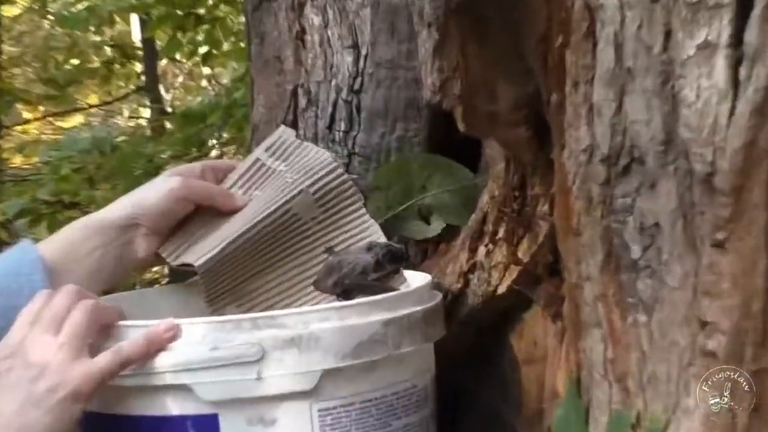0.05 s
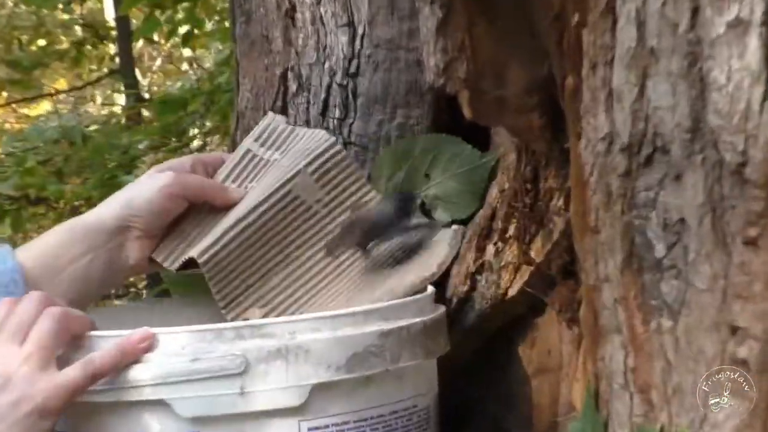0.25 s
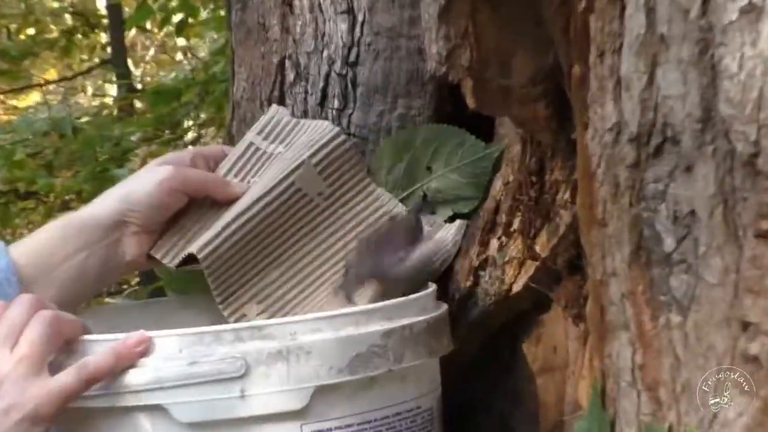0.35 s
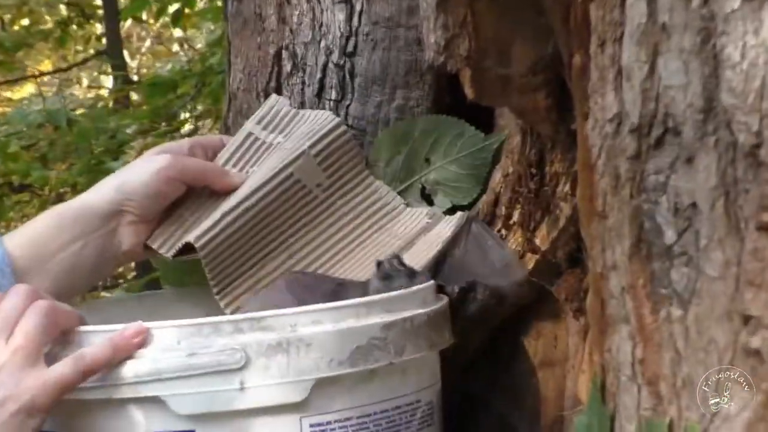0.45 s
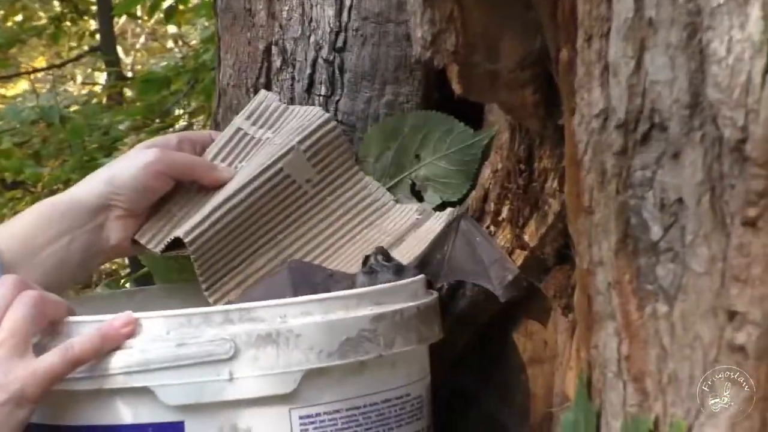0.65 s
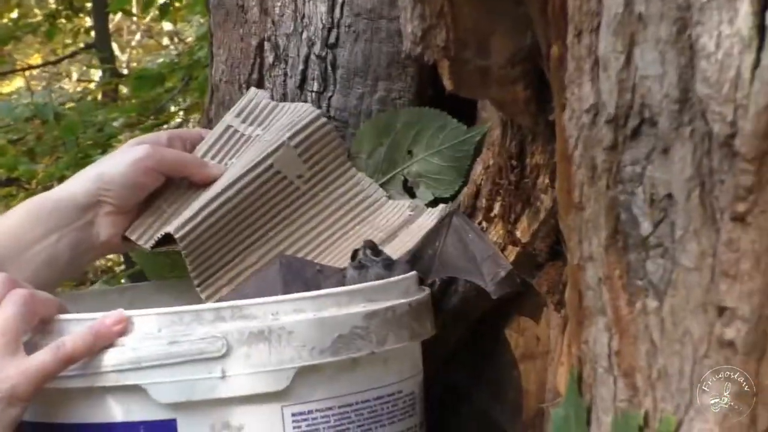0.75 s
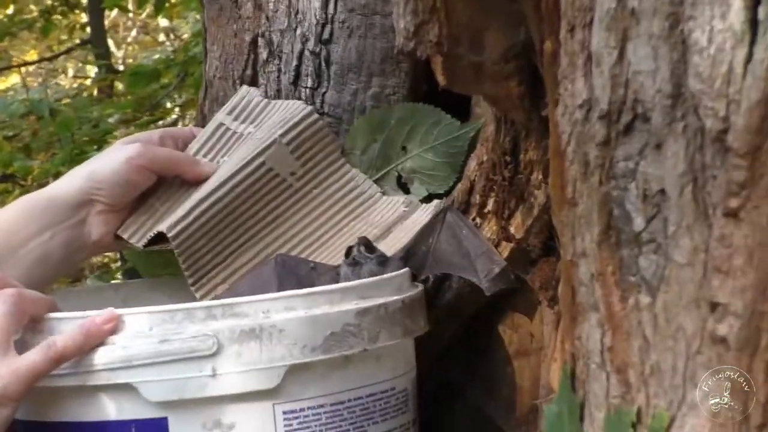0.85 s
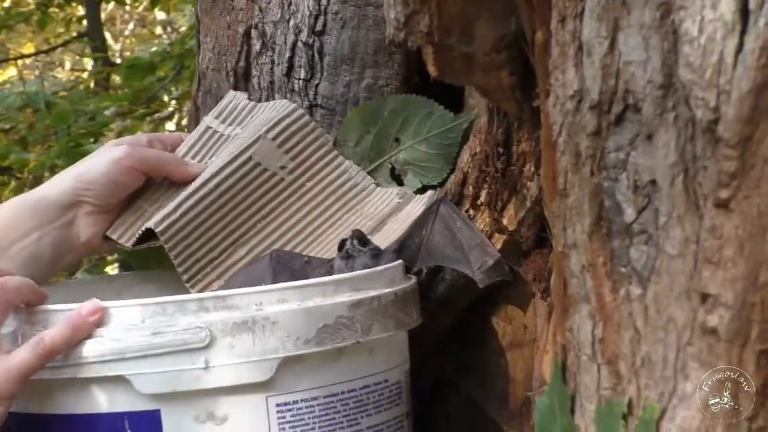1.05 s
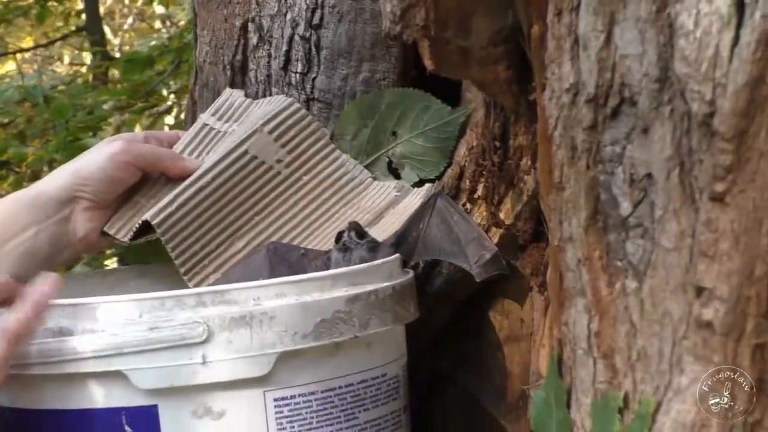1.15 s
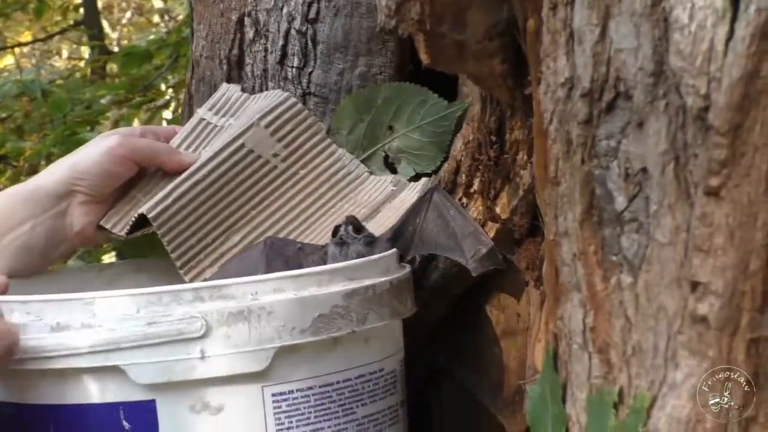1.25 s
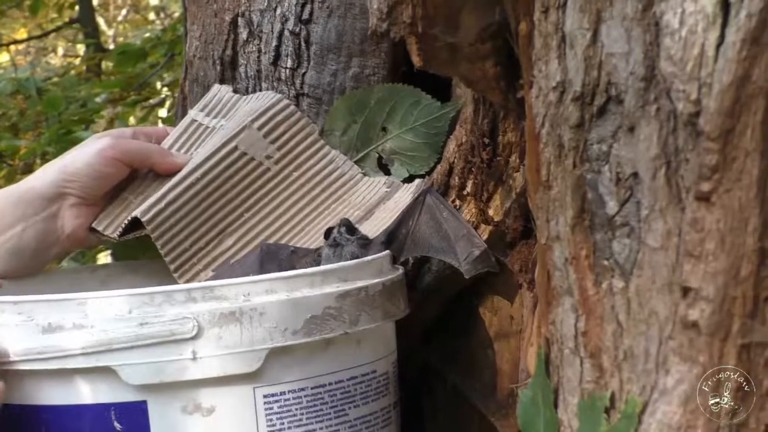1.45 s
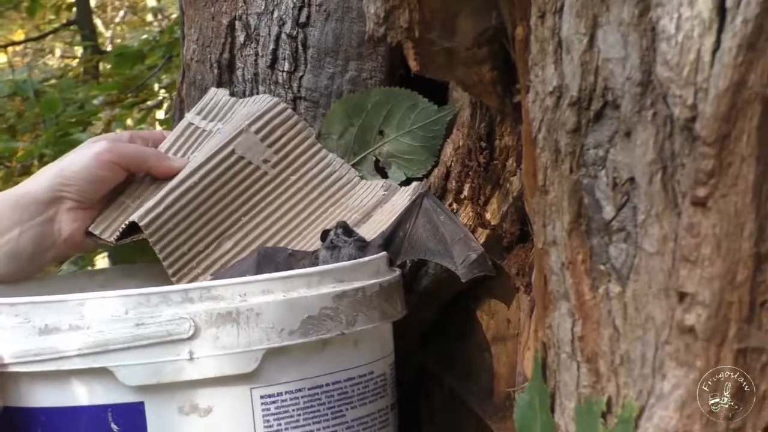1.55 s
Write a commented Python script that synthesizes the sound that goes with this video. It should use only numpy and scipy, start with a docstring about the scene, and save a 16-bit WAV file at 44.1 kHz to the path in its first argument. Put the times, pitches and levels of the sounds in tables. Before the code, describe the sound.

Close by in quiet woods, a bat gives a gritty, clicking hiss right after a brief slide over corrugated cardboard and a thump on a plastic bucket. The hiss stops with a thin squeak, then fingers softly rub the rim.

```python
"""Beside a tree in a murmuring wood, a bat slides off corrugated cardboard and thumps a plastic bucket.
Its claws catch on the card's ridges, then tap the rim and set it ringing. It hisses for one second:
a rasping jet of air through the mouth, broken by sharp clicks that crowd together into a last squeak.
A hand shifts on the rim, and bucket and trunk throw back close echoes."""
import sys
import numpy as np
from scipy import signal
from scipy.fft import rfft, irfft
from scipy.io import wavfile

SR = 44100
rng = np.random.default_rng(int(sys.argv[2]) if len(sys.argv) > 2 else 0)


def waveform_to_disk(signal):
    """Save audio, clipped to [-1, 1], as 16-bit WAV at the path in sys.argv[1]."""
    frames = np.transpose(np.atleast_2d(signal))
    scaled = np.clip(frames, -1, 1) * 32767
    samples = np.round(scaled).astype(np.int16)
    wavfile.write(sys.argv[1], SR, samples)


N = 70560
TIME = np.arange(N) / SR


def from_db(db):
    """Decibels to gain."""
    return 10 ** (np.asarray(db) / 20)


def rms_one(x):
    """Scale to unit power."""
    return x / np.sqrt(np.mean(x ** 2) + 1e-20)


def curve(rows):
    """Join (t/s, value) rows by straight lines."""
    return np.interp(TIME, *np.transpose(rows))


def gesture(rows):
    """A fader move through (t/s, level/dB) rows, silent outside them."""
    return from_db(np.interp(TIME, *np.transpose(rows), left=-200, right=-200))


def noise():
    """White noise."""
    return rng.standard_normal(N)


def coloured(x, spectrum):
    """EQ x through (f/Hz, level/dB) points, then scale to unit power."""
    hz, db = np.transpose(spectrum)
    bins = np.maximum(np.fft.rfftfreq(N, 1 / SR), 1)
    eq = from_db(np.interp(np.log(bins), np.log(hz), db))
    return rms_one(irfft(rfft(x) * eq, N))


def cut(x, hz, kind, order=2):
    """Butterworth low- or high-pass."""
    return signal.sosfilt(signal.butter(order, hz, kind, fs=SR, output="sos"), x)


def bell(at_s, half_s):
    """A smooth pulse of height 1."""
    return np.exp(-.5 * ((TIME - at_s) / half_s) ** 2)


def strikes(rows):
    """One impulse for each (t/s, level/dB) row."""
    times, db = np.transpose(rows)
    samples = np.clip(times * SR, 0, N).astype(int)
    return np.bincount(samples, from_db(db), N + 1)[:N]


def resonance(x, hz, width_hz, block=256):
    """A sweepable band-pass with gain 1 at its peak."""
    r, hz = np.exp(-np.pi * width_hz / SR), np.broadcast_to(hz, N)
    zeros = np.array([1, 0, -1]) * (1 - r * r) / 2
    out, state = np.zeros(N), np.zeros(2)
    for i in range(0, N, block):
        poles = [1, -2 * r * np.cos(2 * np.pi * hz[i] / SR), r * r]
        out[i:i + block], state = signal.lfilter(zeros, poles, x[i:i + block], zi=state)
    return out


def ring(clicks, modes):
    """Clicks set decaying sines going, one for each (f/Hz, level/dB, t60/s) row."""
    out = np.zeros(N)
    for hz, db, t60 in modes:
        r, w = np.exp(-np.log(1000) / (t60 * SR)), 2 * np.pi * hz / SR
        out += from_db(db) * signal.lfilter([1, -1], [1, -2 * r * np.cos(w), r * r], clicks + 1e-18)
    return out


def tail(t60):
    """A reverb tail of decaying noise; energy 1."""
    return rms_one(noise() * np.exp(-np.log(1000) * TIME / t60)) / np.sqrt(N)


# tone of the woodland bed: f/Hz, level/dB
WOOD_EQ = [(15, -54), (25, -31), (97, -9), (195, -8), (249, -1.5), (344, -3), (560, -9.5), (624, -14),
           (796, -11), (936, -10.5), (1130, -7.5), (2280, -16.5), (2550, -15.5), (5140, -29.5),
           (6380, -28.5), (7310, -33), (9840, -32), (13600, -34), (16000, -42)]
def wood(level_db=-46, drift_db_per_s=-.5):
    """The wood murmurs: a dark bed of noise, easing off slightly."""
    return from_db(level_db + drift_db_per_s * (TIME - TIME.mean())) * coloured(noise(), WOOD_EQ)


# pressure of the slide over the card: t/s, level/dB
SLIDE_PRESSURE = [(.212, -60), (.222, -39), (.2255, -27.5), (.232, -25.5), (.248, -23), (.256, -33.5),
                  (.262, -31), (.268, -28.5), (.283, -45), (.295, -52)]
# the wing brushes the card as it spreads: t/s, level/dB
WING_BRUSH = [(.29, -53), (.33, -73), (.39, -40.5), (.42, -54), (.48, -40.5), (.53, -66), (.6, -75)]
# tone of the card: f/Hz, level/dB
CARD_EQ = [(60, -43), (250, -18), (500, -4.5), (900, -9.5), (1240, -0.5), (2090, -6.5), (2550, 1.5),
           (2850, -4.5), (3800, -2), (7970, -14.5), (10300, -11), (15000, -17.5)]
def cardboard(slips_per_s=3500, spread_db=3):
    """Claws and wing catch on the ridges in a dense run of tiny slips."""
    catches = rng.random(N) < slips_per_s / SR
    slips = catches * from_db(spread_db * noise()) * rng.choice([-1, 1], N)
    return coloured(slips, CARD_EQ) * (gesture(SLIDE_PRESSURE) + gesture(WING_BRUSH))


# claw hits: t/s, level/dB
CLAW_TAPS = [(0.247, -22), (0.277, -32), (0.297, -28.5), (0.3883, -23), (0.396, -40), (0.9964, -33),
             (1.4823, -45), (1.497, -34)]
# what a claw sets ringing in the rim: f/Hz, level/dB, t60/s
RIM_MODES = [(1150, -17, 0.022), (1260, -3, 0.023), (1580, -5.5, 0.018), (2100, -13, 0.0083),
             (2874, -5.5, 0.017), (3630, -11, 0.0057), (4400, -30, 0.0053), (7100, -11, .002)]
def claws(scratch_hz=2700, waver_hz=170):
    """Claws tap dryly on the rim and slip once with a short squeak."""
    taps = ring(cut(strikes(CLAW_TAPS), hz=5900, kind="low"), RIM_MODES)
    slip_hz = scratch_hz + waver_hz * rms_one(cut(noise(), hz=603, kind="low"))
    slip_tone = np.sin(2 * np.pi * np.cumsum(slip_hz) / SR)
    return taps + from_db(-26.5) * bell(at_s=.4595, half_s=.0024) * slip_tone


# body hits on the bucket: t/s, level/dB
BODY_THUMPS = [(.2495, -13.5), (.2965, -29.5), (.302, -33.5)]
# modes of the bucket: f/Hz, level/dB, t60/s
BUCKET_MODES = [(248, -20, 0.13), (380, -9.5, 0.031), (434, -3, 0.023), (510, -10.5, 0.026),
                (1193, -2, 0.04), (1290, -17, 0.12), (2138, -19, 0.19), (2600, -14, .1)]
def bucket(soft_hz=890, low_cut_hz=248, hum_at_s=.299, hum_hz=257, hum_t60_s=.14):
    """The soft body bumps the plastic wall, which radiates little bass and hums on briefly."""
    push = cut(strikes(BODY_THUMPS), soft_hz, "low")
    thump = ring(cut(push, low_cut_hz, "high"), BUCKET_MODES)
    age = np.maximum(TIME - hum_at_s, 0)
    hum = from_db(-30) * np.exp(-np.log(1000) * age / hum_t60_s) * np.sin(2 * np.pi * hum_hz * age)
    return thump + cut(hum, low_cut_hz / 2, "high")


def rasp(puffs_per_s=270, jitter=.3, decay_s=.00059, spread_db=3, depth=.8, count=800):
    """The airflow flutters in quick uneven puffs, giving the hiss its grit."""
    times = np.cumsum(np.exp(jitter * rng.standard_normal(count))) / puffs_per_s
    db = spread_db * np.clip(rng.standard_normal(count), -2, 2)
    onsets = strikes(np.column_stack([times, db]))
    puffs = signal.lfilter([1], [1, -np.exp(-1 / (decay_s * SR))], onsets)
    return rms_one(1 + depth * puffs)


# mouth resonances: f/Hz, share of the jaw shift, relaxed level/dB, strained level/dB
MOUTH_FORMANTS = [(3810, 0.67, -15.5, -8.5), (4773, 0.9, -8.5, -5.5), (5520, .2, -9.5, -8.5),
                  (6775, 0.099, -7.5, -2), (8590, 0.32, -3.5, -0.5), (9810, 0.52, 1, -8.5),
                  (11530, 0.91, 4, -5), (13280, 0.83, 5, 2.5), (14720, 0.19, -2, 7), (16400, 0.17, -4, 3.5)]
# head and jaw move and bend the resonances together: t/s, shift/%
JAW_SHIFT = [(.30, 3), (.335, 0), (.37, -6.5), (.405, 3), (.445, -7), (.49, -4), (.58, -6.5), (.625, -6),
             (.655, 1), (.76, 0), (.85, .5), (.96, -1.5), (1.06, -5), (1.16, -7), (1.3, -7.5)]
# the hiss tightens and its weight moves to the top: t/s, strain/0-1
HISS_STRAIN = [(.3, 0.3), (.45, 0.17), (.67, 0.3), (.88, 0.37), (1.05, 0.72), (1.3, 0.85)]
# a bright band of the hiss sweeps up and down at its start: t/s, f/Hz, level/dB
HISS_SWEEP = [(.30, 11700, -7), (.34, 10500, 9), (.372, 10100, -3), (0.398, 9300, 2.5), (.415, 10400, -7),
              (.432, 11500, 4), (.47, 10300, -7), (.51, 9800, -6), (.60, 8900, -27)]
def mouth(flow, rush_db=-16, sweep_width_hz=900):
    """Turbulent air, as strong as the flow, sounds a rush and moving formants; a bright band sweeps."""
    strain, shift = curve(HISS_STRAIN), curve(JAW_SHIFT) / 100
    times, sweep_hz, sweep_db = np.transpose(HISS_SWEEP)
    peaks = [(np.interp(TIME, times, sweep_hz), sweep_width_hz, np.interp(TIME, times, sweep_db))]
    for hz, share, relaxed_db, strained_db in MOUTH_FORMANTS:
        width_hz = 400 + .055 * hz
        db = relaxed_db + strain * (strained_db - relaxed_db)
        peaks.append((hz * (1 + share * shift), width_hz, db))
    air = from_db(rush_db) * flow * noise()
    for hz, width_hz, db in peaks:
        band = resonance(flow * noise(), hz, width_hz)
        air += from_db(db) * resonance(band, hz, width_hz)  # twice, for steeper skirts
    return cut(air, hz=3180, kind="high", order=4)


# force of the hiss: t/s, level/dB
HISS_EFFORT = [(.300, -58), (.307, -27.5), (.333, -24), (.352, -31.5), (.378, -32), (.40, -29),
               (.416, -32.5), (.44, -32.5), (.53, -34), (.70, -33), (.80, -33.5), (.94, -32.5),
               (1.06, -32.5), (1.20, -31.5), (1.28, -31.5), (1.298, -27.5), (1.306, -39), (1.316, -70)]
# sharp clicks in the hiss: t/s, level/dB
HISS_CLICKS = [(0.3035, -28), (0.331, -34), (0.335, -30), (0.3569, -25), (0.3817, -32), (0.3952, -21.5),
               (0.402, -37), (0.4093, -25), (.428, -31), (.436, -24), (0.4672, -37), (0.4695, -32),
               (.502, -24.5), (0.8872, -22.5), (.913, -27), (0.9398, -21), (0.953, -24), (1.0272, -30),
               (1.036, -24.5), (1.105, -36), (1.1176, -31), (1.135, -36), (1.171, -32), (1.220, -23),
               (1.265, -27), (1.2744, -30), (1.2845, -29), (1.2905, -17.5), (1.295, -21)]
def hiss():
    """A rasping flow of air, spiked with clicks, passes through the mouth."""
    clicks = sum(from_db(db) * bell(at_s, half_s=.00031) for at_s, db in HISS_CLICKS)
    flow = gesture(HISS_EFFORT) * rasp() + clicks
    return np.sqrt(np.mean(flow ** 2)) * rms_one(mouth(flow))


# voiced squeaks: t/s, level/dB, half length/s
VOICE_CHIRPS = [(1.218, -13, .0006), (1.243, -21, .0005), (1.2568, -22, .0005), (1.2834, -15, .0005),
                (1.2905, -17, .0007), (1.295, -19, .0006), (1.2985, -6, 0.0015)]
def squeaks(centre_hz=14420, fall_hz_per_s=660000, rough_rad=.21):
    """The voice catches in very high, rough, falling chirps."""
    out = np.zeros(N)
    for at_s, db, half_s in VOICE_CHIRPS:
        age = TIME - at_s
        turns = centre_hz * age - fall_hz_per_s * age ** 2 / 2
        waver = rough_rad * rms_one(cut(noise(), hz=900, kind="low"))
        out += from_db(db) * bell(at_s, half_s) * np.sin(2 * np.pi * turns + waver)
    return out


# the hand shifts on the rim: t/s, level/dB
HAND_MOVE = [(1.32, -63), (1.355, -45), (1.39, -54), (1.42, -68), (1.47, -68), (1.484, -46), (1.505, -54.5),
             (1.53, -79), (1.553, -51), (1.6, -75)]
# tone of the rub: f/Hz, level/dB
HAND_EQ = [(100, -20), (400, 9), (750, -6), (1250, 6), (1900, -16), (2700, -7), (4000, -27), (15000, -30)]
def hand():
    """Fingers rub softly on the plastic."""
    return gesture(HAND_MOVE) * coloured(noise(), HAND_EQ)


# early reflections from bucket and trunk: t/s, level/dB
REFLECTIONS = [(.0056, -25.5), (.00617, -16), (.0066, -21), (.0095, -16.5), (0.0132, -20.5)]
def surroundings(x):
    """Close echoes, quick scatter from bucket and bark, and a faint tail that lasts longest at the top."""
    direct = strikes([(0, 0)])
    scatter = from_db(-12) * tail(t60=.077) + from_db(-23) * tail(t60=.2)
    sheen = rms_one(resonance(tail(t60=.3), hz=13600, width_hz=1700)) / np.sqrt(N)
    response = direct + strikes(REFLECTIONS) + scatter + from_db(-30) * sheen
    return signal.fftconvolve(x, response)[:N]


def scene():
    """Voice and foley share one small space over the woodland bed, in mono."""
    bed = wood()
    voice = hiss() + squeaks()
    foley = cardboard() + bucket() + claws() + hand()
    return (surroundings(voice + foley) + bed)[None]


def record(dry, cutoff_hz=15780):
    """A steep low-pass takes off the very top."""
    return signal.sosfilt(signal.ellip(12, .1, 80, cutoff_hz, fs=SR, output="sos"), dry)


dry = scene()
out = record(dry)
waveform_to_disk(out)
```